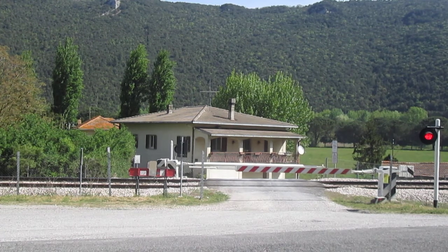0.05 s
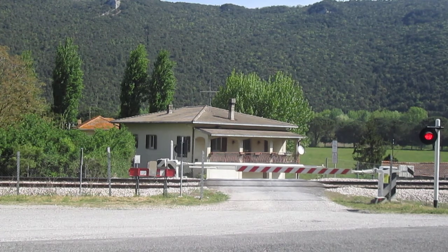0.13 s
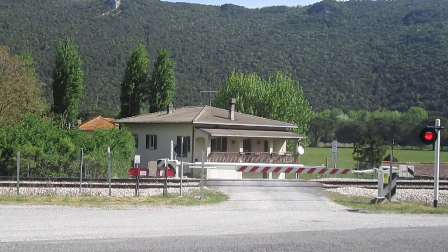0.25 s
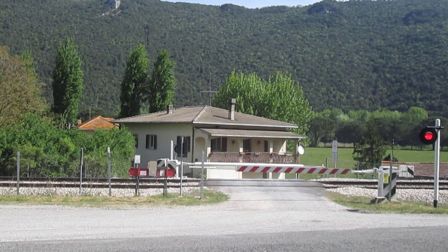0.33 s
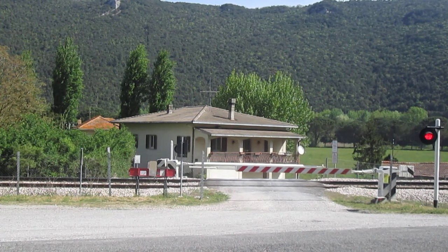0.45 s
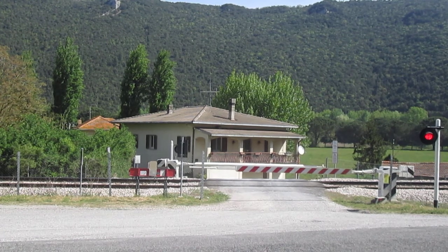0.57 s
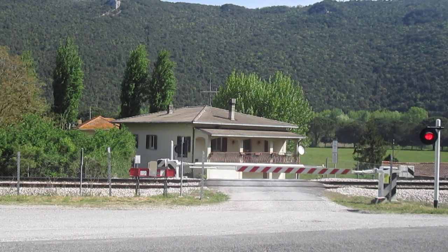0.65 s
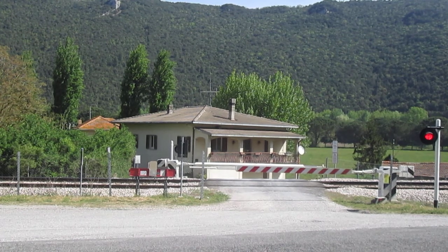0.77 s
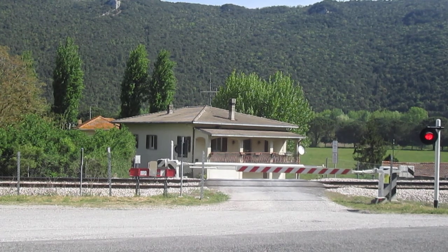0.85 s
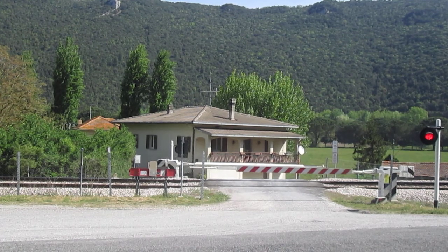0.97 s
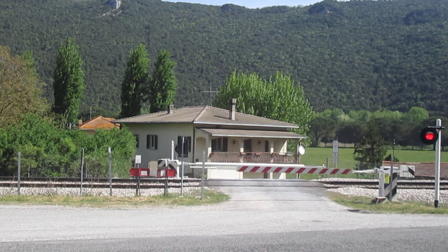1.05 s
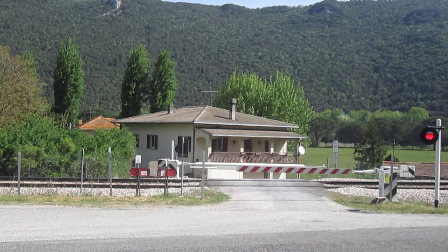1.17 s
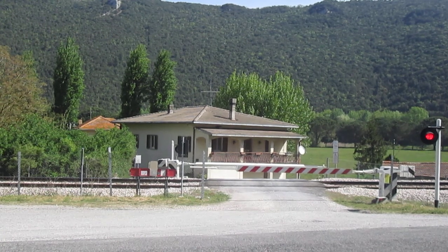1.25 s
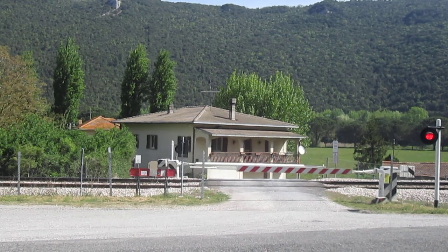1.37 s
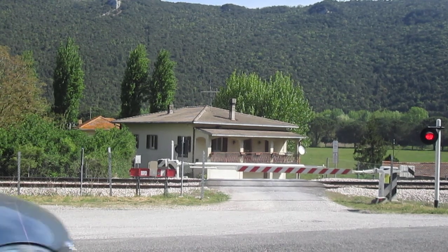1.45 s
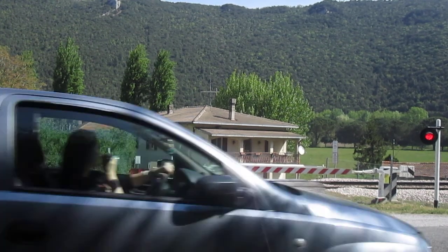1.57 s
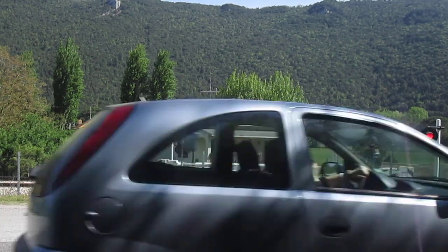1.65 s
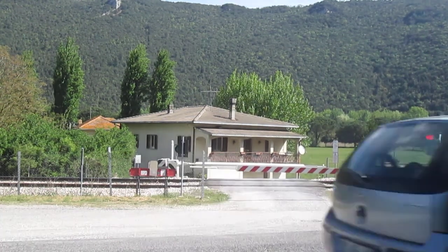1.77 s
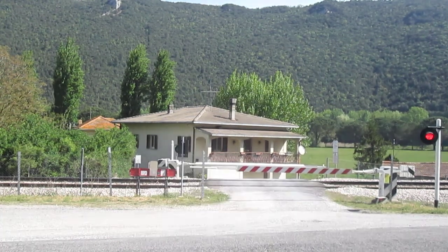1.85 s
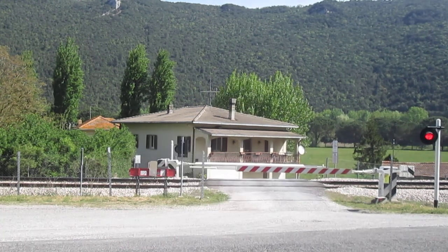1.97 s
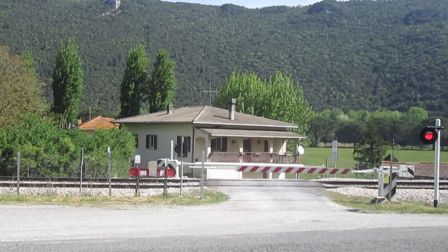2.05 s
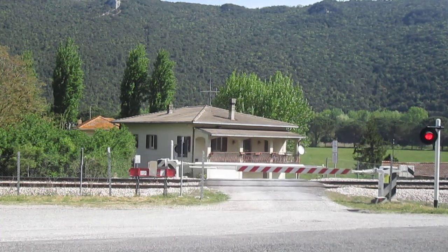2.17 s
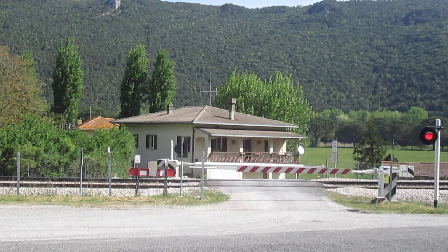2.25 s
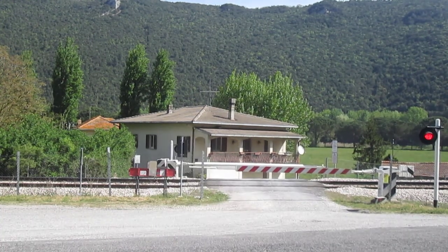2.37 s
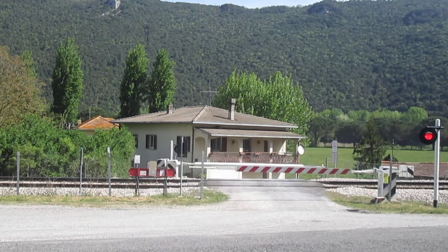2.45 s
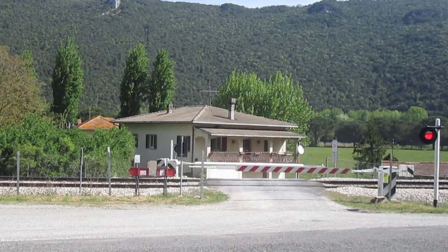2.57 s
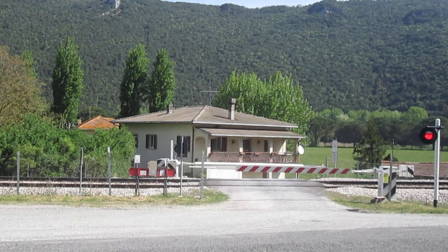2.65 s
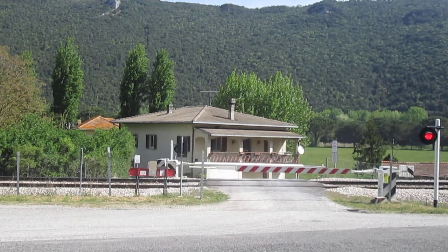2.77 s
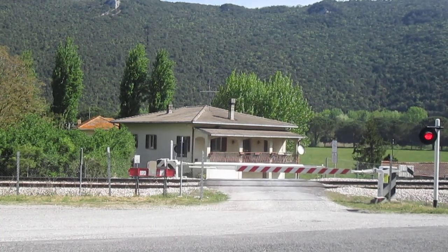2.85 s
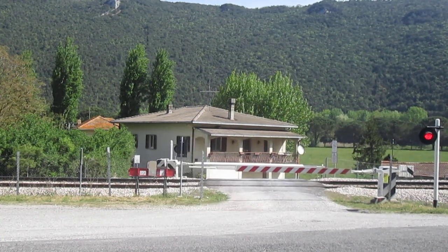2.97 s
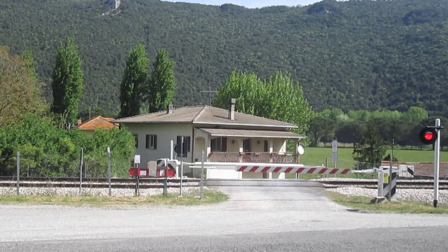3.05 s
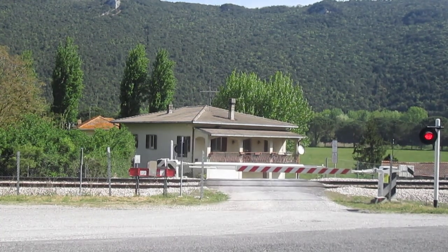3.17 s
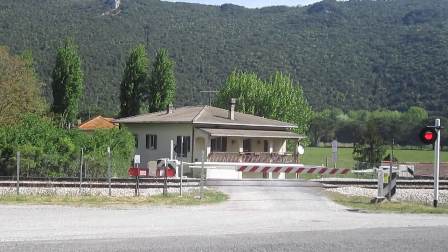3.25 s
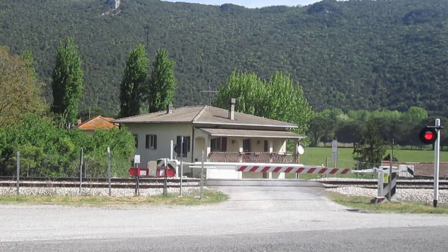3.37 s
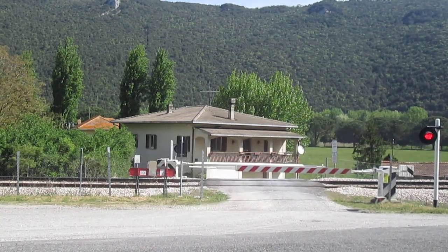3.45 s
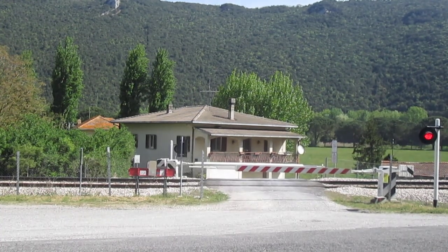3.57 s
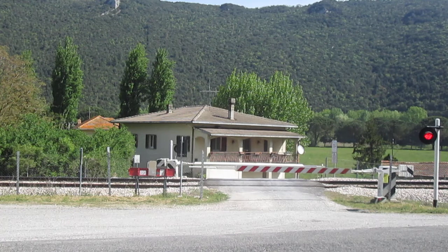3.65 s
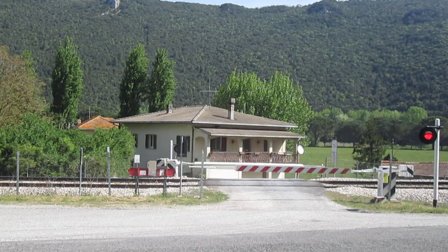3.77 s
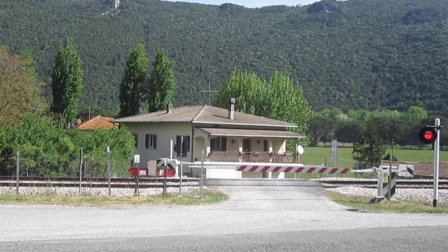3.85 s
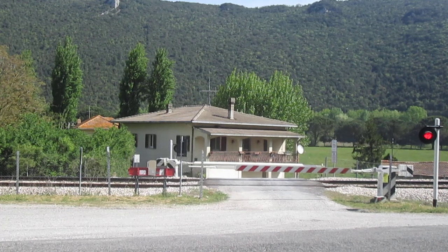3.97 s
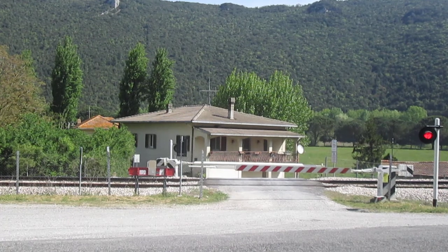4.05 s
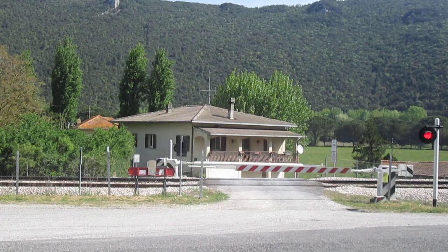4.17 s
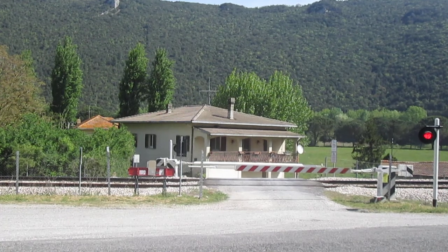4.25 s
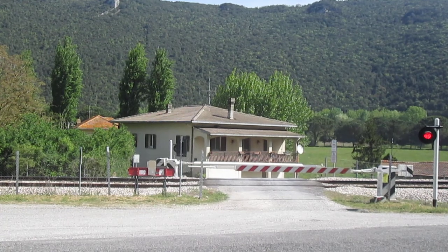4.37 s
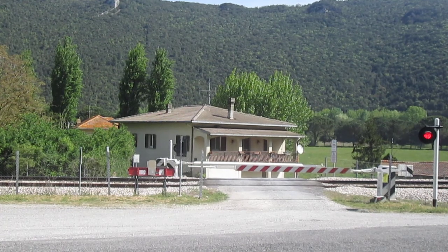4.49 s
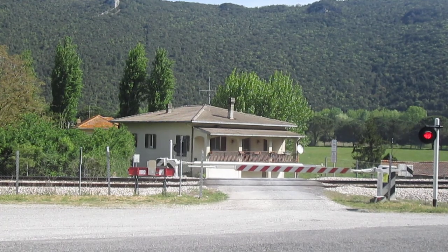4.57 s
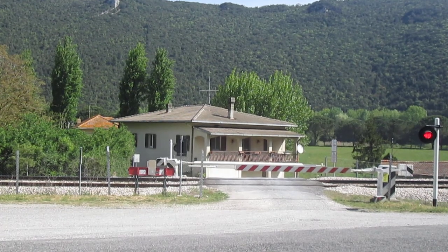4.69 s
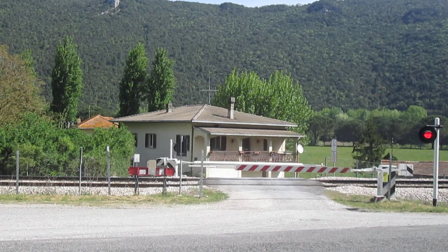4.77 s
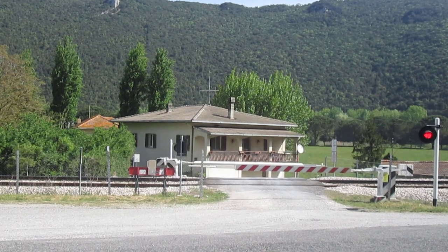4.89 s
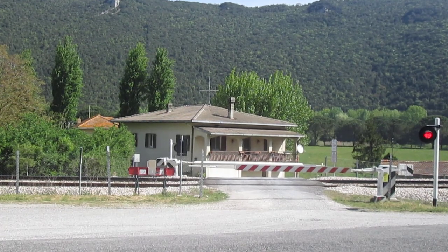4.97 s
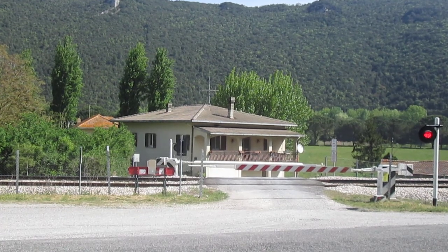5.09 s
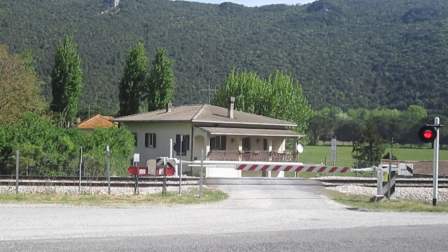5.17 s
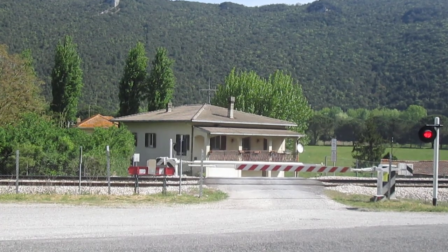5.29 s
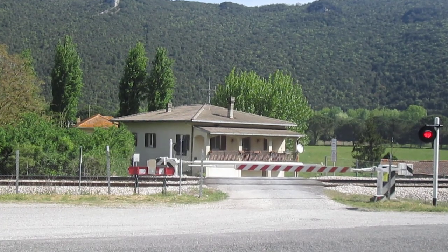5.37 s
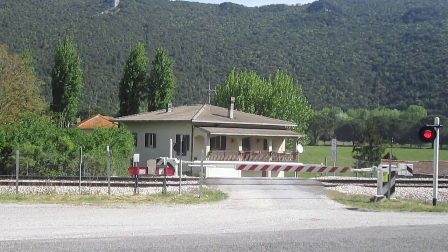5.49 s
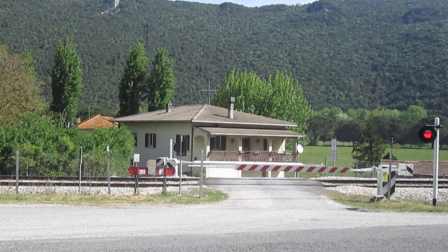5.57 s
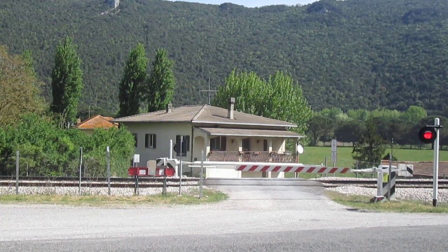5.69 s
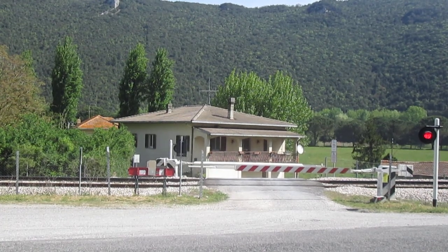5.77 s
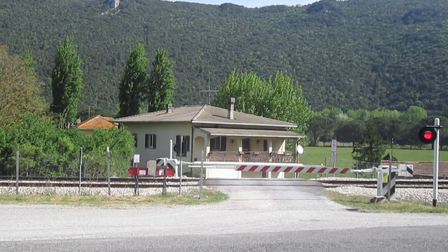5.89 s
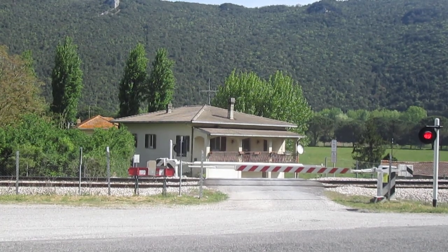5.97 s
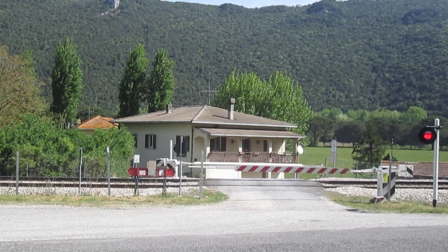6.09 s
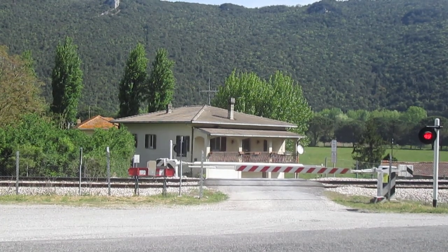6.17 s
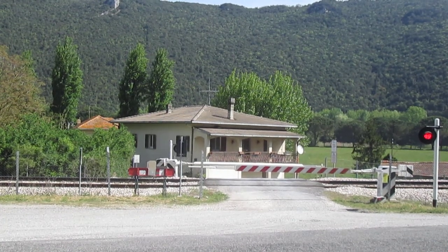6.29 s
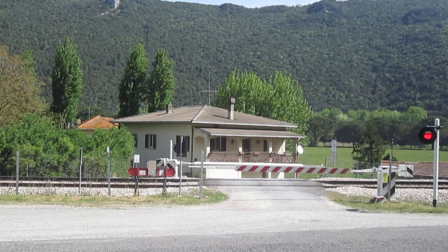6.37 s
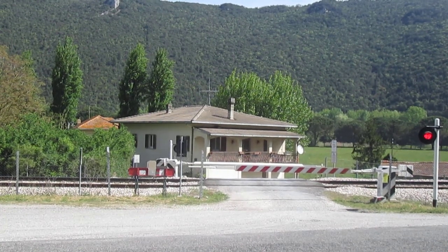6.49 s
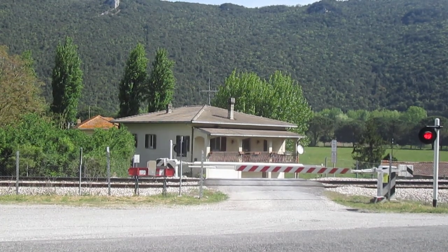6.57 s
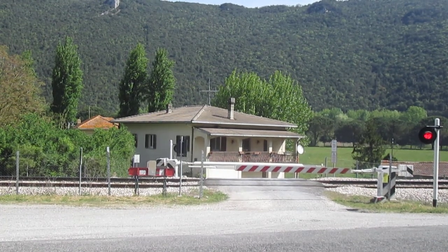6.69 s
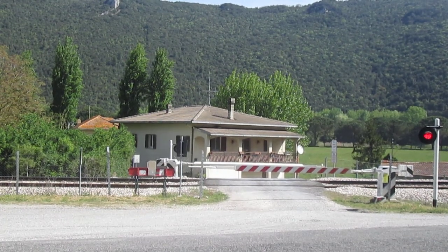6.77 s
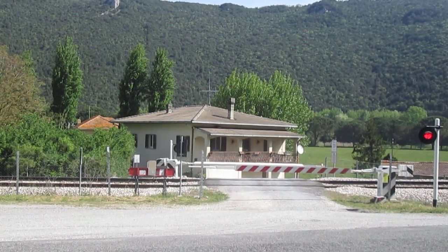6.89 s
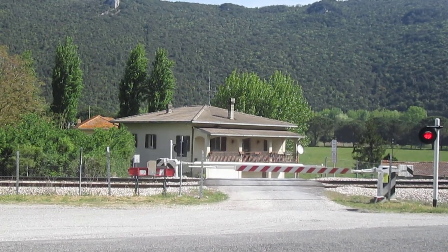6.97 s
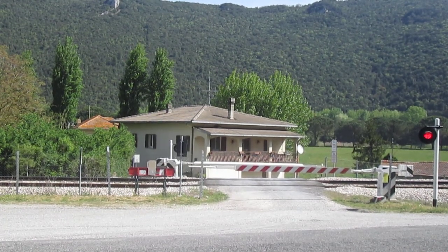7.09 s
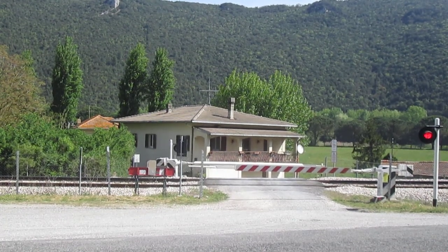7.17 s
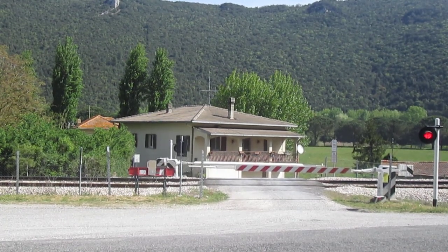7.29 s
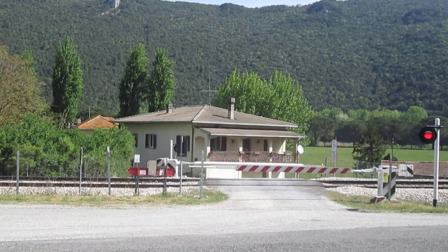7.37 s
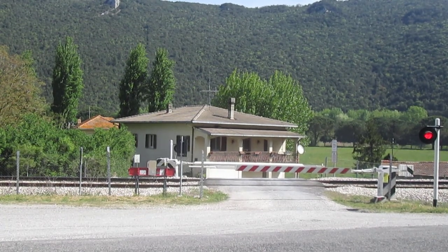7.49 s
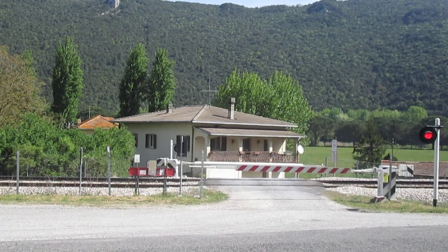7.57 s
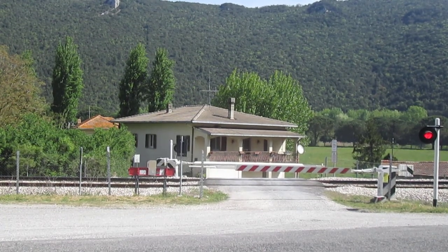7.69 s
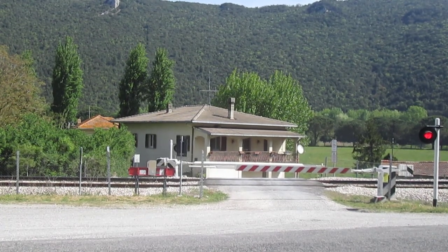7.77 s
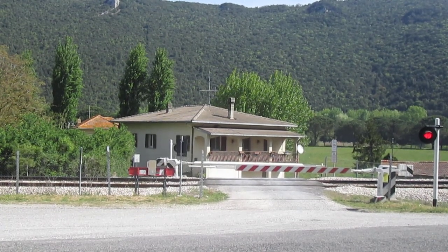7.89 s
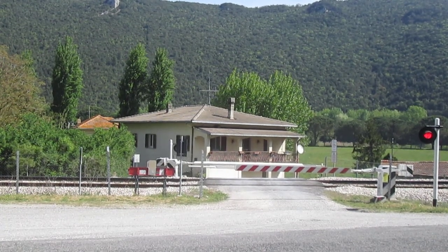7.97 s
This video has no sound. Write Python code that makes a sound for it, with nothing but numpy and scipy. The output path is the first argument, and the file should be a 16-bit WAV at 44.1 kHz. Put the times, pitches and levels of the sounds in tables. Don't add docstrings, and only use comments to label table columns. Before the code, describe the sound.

Tyre roar swells quickly, peaks as a car passes left to right, and recedes, leaving faint idling drone and light, quick birdsong with echoes.

```python
import sys
import numpy as np
from scipy import signal
from scipy.fft import rfft, irfft, next_fast_len
from scipy.io import wavfile
from scipy.ndimage import uniform_filter1d

SR = 44100
rng = np.random.default_rng(int(sys.argv[2]) if len(sys.argv) > 2 else 0)


def undo_db(level):
    steps = np.asarray(level, float) / 20
    return 10 ** steps


def unload_wav(signal):
    wavfile.write(
        sys.argv[1],
        SR,
        np.round(np.clip(np.atleast_2d(signal).T, -1, 1) * 32767).astype(np.int16),
    )


N = 354555
SIZE = next_fast_len(N)
TIME = np.arange(N) / SR
FREQ = np.maximum(np.fft.rfftfreq(SIZE, 1 / SR), 1)
SOUND_M_S = 343

# time in seconds [s], level [dB], brightness [dB].
TYRE_ROAR = [(0, -39.5, 0), (.3, -34, -3.5), (.6, -33.5, 2.5), (1.1, -26, 7), (1.362, -20.5, 3),
             (1.378, -18, 0.5), (1.55, -17.5, -1.5), (1.68, -18, -1.5), (1.9, -24, 3.5), (2.15, -26, 2.5),
             (2.4, -28.5, 1), (2.7, -29, 0), (3.05, -32.5, 2.5), (3.5, -39.5, 4.5), (4.0, -44, -3),
             (4.3, -48.5, -8), (4.7, -56.5, -0.5), (5.3, -66, 2)]
# time [s], side [0 front, 1 side, 2 rear, 3 far].
BEARING = [
    (0, 0),
    (.8, 0.94),
    (1.35, 1.5),
    (1.7, 1.5),
    (2.2, 2),
    (2.9, 2),
    (3.7, 3),
    (8.1, 2.5),
]
# frequency [Hz], spectral level [dB per Hz].
FRONT_COLOUR = [(55, -30), (90, -8), (328, -2), (562, -3.5), (700, -8), (870, -10), (1050, -6),
                (1250, -6.5), (1650, 3), (2100, -5.5), (2900, -20.5), (4400, -26.5), (6300, -35),
                (9500, -46), (15600, -72.5)]
SIDE_COLOUR = [(53, -16), (90, -7), (145, -10), (288, -2), (484, -8.5), (744, -7), (904, -2.5), (1360, -4),
               (2890, -22), (3910, -30.5), (8880, -44), (15600, -62)]
REAR_COLOUR = [(60, -39.5), (100, -12), (250, -5), (313, -5), (400, -16.5), (500, -4), (575, 2), (650, -3),
               (800, -10), (930, -4), (1090, -2), (1270, -5.5), (2100, -15), (2650, -21.5), (3600, -32),
               (8800, -51), (15600, -66)]
FAR_COLOUR = [(60, -36.5), (105, -9), (186, -5.5), (360, -13), (607, 3), (772, -11), (930, -1.5), (1080, 1),
              (1220, -7.5), (1400, -2.5), (2300, -10), (3300, -27), (12000, -58.5), (15600, -70)]
RUMBLE_DB, RUMBLE_FOLLOWS = -0.18, 0.05
HISS_DB, HISS_FOLLOWS, TOP_FOLLOWS = 2.5, 0.84, 0.53
BODY_S, BODY_LENGTH_S, BODY_DB = 1.747, 0.43, 1
# centre time [s], half length [s], centre frequency [Hz], bandwidth [Hz], level [dB].
ROAD_SURGES = [(.57, .06, 9100, 1300, -67), (.586, .002, 9000, 2000, -59), (.606, .003, 7500, 2000, -56),
               (.85, .15, 5370, 1300, -50), (1.3, .12, 2400, 600, -32), (1.4, .1, 12000, 2000, -63),
               (1.5, .08, 395, 80, -24.5), (1.388, .012, 350, 250, -19.5), (1.425, .03, 290, 50, -21),
               (1.41, .03, 980, 60, -20), (1.497, .03, 907, 45, -17), (1.48, .015, 1380, 60, -22),
               (1.55, 0.028, 1200, 50, -22), (1.6, .04, 900, 50, -20.5), (1.65, .05, 1280, 70, -24),
               (1.78, .1, 11500, 1500, -68), (1.85, .05, 2900, 500, -40), (1.88, 0.029, 1160, 80, -27),
               (2.17, .1, 6800, 700, -63), (2.4, .15, 9200, 700, -76), (2.8, .2, 9100, 1000, -73),
               (3.2, .15, 9000, 900, -80), (3.25, .1, 4080, 400, -61), (1.3, .06, 620, 130, -27),
               (2.7, .12, 580, 30, -36), (1.5, .08, 260, 50, -27), (1.73, .06, 210, 40, -27),
               (1.55, .1, 10500, 1800, -62), (2.9, .3, 4000, 500, -61), (1.75, .08, 1450, 200, -28),
               (1.55, .17, 100, 35, -31), (1.35, .08, 70, 12, -33), (.35, .2, 1060, 30, -42),
               (.5, .12, 1740, 60, -38), (2.3, .08, 1080, 40, -33), (1.9, .08, 1700, 120, -34),
               (2.35, .15, 2050, 200, -42), (2.65, .1, 2550, 150, -48), (3.45, .15, 2550, 200, -54),
               (.852, .004, 6000, 2000, -46)]

# multiple of the firing rate [1], level [dB].
EXHAUST_ORDERS = [(1, -0.5), (2, -23), (4, -21), (5, -30)]
# time [s], level [dB].
THIRD_ORDER = [
    (0, -56),
    (1.55, -43),
    (2.6, -54),
    (3.4, -59),
    (4.5, -61),
    (5.6, -63),
    (6.2, -70),
    (8.04, -75),
]
PASSES_S, SPEED_M_S, KERB_M = 1.58, 21.0, 3.4
FIRING_HZ, SAG_HZ_PER_S = 52, .45
EXHAUST_DB, FADE_DB_PER_S = -20.5, 0.27
SPREAD = 0.79
AHEAD_DB = 1
SHADE_S, SHADE_LENGTH_S, SHADE_DB = 1.65, .09, -11
BEND_S, BEND_LENGTH_S, BEND_DB = 4, .2, -4.5

# time [s], peak [dB], frequency [Hz], signed polarity [1].
WAKE_THUMPS = [
    (1.984, -27, 70, -0.87),
    (2.005, -23, 59.9, -0.98),
    (2.234, -22, 80, 0.96),
    (2.982, -30, 64.8, -0.81),
    (3.1687, -17.5, 100.6, 0.53),
    (7.850, -28, 90.05, 0.57),
]
# frequency [Hz], spectral level [dB per Hz].
BUFFET_COLOUR = [(15, -18), (30, -1.5), (45, 0.0), (75, -3), (100, -14.5), (250, -60.5)]
BREEZE_DB, WAKE_S, WAKE_DB, WAKE_RISE_S, WAKE_FALL_S = -64, 1.5, -47, 0.5, 0.6

# time [s], level [dB].
WAITING_ENGINE = [
    (0, -54),
    (2.4, -48),
    (4.8, -52),
    (6, -48.5),
    (7, -48),
    (8.04, -44),
]
IDLE_HZ = 82.84

# start [s], length [s], first pitch [Hz], last pitch [Hz], peak [dB].
ARCHES = [
    (7.165, 0.068, 1960, 1934, -59.5),
]
# start [s], length [s], first pitch [Hz], last pitch [Hz], peak [dB].
DIPS = [
    (7.012, 0.049, 2350, 2050, -62),
    (6.78, 0.056, 3120, 3000, -60.5),
    (7.272, 0.06, 2950, 2800, -63),
]
# start [s], length [s], first pitch [Hz], last pitch [Hz], peak [dB].
SWOOPS = [
    (5.53, .052, 4300, 3300, -55),
    (5.628, .02, 3450, 2800, -57),
    (5.898, .036, 3300, 2300, -55),
    (6.168, .04, 2800, 2420, -57),
    (6.4, .075, 3050, 2650, -66),
]
# start [s], length [s], first pitch [Hz], last pitch [Hz], peak [dB].
FALLS = [(3.612, .02, 3450, 3200, -59), (4.352, 0.0199, 3494, 2750, -57), (4.893, 0.018, 3270, 3150, -57),
         (5.16, 0.02, 3490, 3125, -52), (5.462, 0.022, 3480, 3050, -61), (5.482, .025, 3150, 3050, -63),
         (5.572, .038, 3330, 3180, -51), (5.612, .014, 3400, 2850, -57), (5.65, .02, 2850, 2600, -54),
         (5.672, .014, 3750, 2700, -62), (4.803, .028, 3250, 2700, -61), (4.908, .024, 3150, 2350, -59),
         (5.6, .03, 4300, 3500, -66), (5.7, .02, 3300, 2800, -65), (3.882, .016, 3550, 3050, -61),
         (5.955, 0.04, 2900, 2770, -52), (5.93, .025, 3200, 2850, -62), (6.068, 0.068, 3130, 2830, -52),
         (6.14, 0.0246, 3027, 2458, -53.5), (6.552, 0.065, 2830, 2480, -53), (7.735, .03, 3150, 2950, -67),
         (6.918, 0.029, 3300, 2644, -58), (6.984, 0.039, 3280, 2045, -54.5), (7.25, 0.023, 3480, 3000, -66),
         (7.352, 0.036, 3020, 2930, -58), (7.4, .018, 3200, 2950, -65), (7.485, 0.018, 2600, 2430, -64)]
# start [s], length [s], first pitch [Hz], last pitch [Hz], peak [dB].
RISES = [(4.298, 0.016, 3950, 4600, -61), (4.336, .018, 3050, 3622, -59), (4.737, 0.027, 3373, 3500, -66.5),
         (5.385, 0.0714, 2110, 2508, -56.5), (5.428, 0.0216, 2970, 3510, -54),
         (6.048, 0.022, 2972, 3500, -61), (6.528, 0.031, 2450, 2810, -56), (6.587, .013, 3000, 3600, -59),
         (6.852, .068, 2180, 2550, -55.5), (6.892, 0.0283, 2820, 3334, -56.5),
         (7.045, .085, 1885, 2400, -60.5), (7.83, 0.06, 2978, 3170, -66), (4.785, .02, 3000, 3250, -59),
         (5.643, .01, 2700, 2850, -55), (5.855, .014, 2800, 3300, -62), (5.93, .02, 2200, 2400, -61),
         (6.96, .06, 4100, 4200, -70), (7.5, .025, 2430, 2520, -61), (3.868, .014, 3200, 3550, -63),
         (2.852, .014, 4050, 4350, -59), (6.24, .07, 2850, 3000, -69), (7.42, .09, 2950, 3100, -70)]
# start [s], length [s], pitch [Hz], peak [dB].
PIPS = [(4.001, 0.024, 4017, -60.5), (4.015, 0.0317, 3260, -58), (4.329, 0.041, 4330, -70.5),
        (4.388, 0.025, 3250, -66), (4.412, .012, 2950, -64), (5.675, 0.038, 3240, -67.5),
        (5.864, 0.0373, 3320, -53.5), (5.913, 0.023, 3350, -58), (6.258, 0.059, 2980, -65),
        (6.27, 0.04, 4080, -61), (6.478, 0.014, 4250, -63), (6.495, .016, 4170, -61),
        (6.603, .016, 3400, -55), (6.86, 0.0273, 3376, -61.5), (6.95, .035, 2500, -67),
        (5.31, .055, 2330, -70), (5.005, .03, 2370, -64), (4.62, .06, 7200, -77), (5.15, .05, 6300, -75),
        (5.44, .02, 2460, -58), (6.968, .02, 3150, -54), (6.72, 0.017, 4100, -61), (6.78, 0.135, 4110, -71),
        (6.695, .018, 4100, -60), (7.418, .02, 2950, -60), (5.662, .012, 3700, -62), (6.6, .11, 2600, -70),
        (6.785, .07, 3300, -67), (5.33, .06, 4100, -68), (7.155, 0.016, 4265, -57),
        (7.233, .014, 3590, -62.5), (7.292, .02, 4210, -69.5), (7.524, 0.028, 3320, -66),
        (7.57, .022, 3250, -56), (7.612, 0.014, 3150, -61), (7.7, 0.03, 3420, -70)]
ARCH_BOW, DIP_BOW, SWOOP_BOW = 0.093, -0.12, -.05
START_DB, END_DB, PEAK_SHARE, HOLD_SHARE = -5.5, -7.5, 0.31, .4
# time of the drop [s], drop length [s], top pitch [Hz], bottom pitch [Hz], peak [dB].
HOOKS = [
    (5.25, 0.04, 4602, 4020, -56.5),
    (6.292, .026, 4065, 3198, -53),
    (6.716, 0.026, 4063, 3260, -51.5),
]
HOOK_SAG = .25
LEAD_S, LEAD_DB, TOP_DB = 0.02, -16, -6.5
SHELF_S, SHELF_LIFT, SHELF_DB = 0.03, 0.04, -1
TAIL_S, TAIL_DB = .012, -12.5
# start [s], first pitch [Hz], last pitch [Hz], level [dB].
CHIRPS = [(3.526, 4110, 4810, -59.5), (3.598, 2970, 3600, -57), (3.986, 4500, 3860, -65),
          (4.034, 3900, 2900, -60), (4.306, 4000, 3100, -71), (5.068, 3300, 3750, -62),
          (5.088, 3300, 2800, -64), (4.775, 3300, 2800, -64), (7.222, 3300, 3800, -60),
          (7.252, 2900, 3400, -62), (4.765, 3494, 3250, -65), (4.972, 3800, 2910, -55.5),
          (5.002, 2353, 2910, -58), (5.016, 2874, 3400, -61.5), (5.019, 2998, 2303, -57),
          (5.056, 3314, 3820, -60.5), (5.073, 3396, 4690, -59.5), (5.092, 4600, 4700, -66.5),
          (5.147, 3126, 3710, -58), (5.372, 2370, 2116, -58), (5.188, 2810, 2400, -63),
          (5.618, 4390, 5250, -68.5), (5.877, 3950, 4600, -62), (6.01, 4000, 4400, -67),
          (5.852, 2600, 3200, -65), (6.878, 3400, 2800, -63), (6.488, 4170, 2990, -65),
          (6.512, 4180, 4700, -65), (6.519, 3900, 2750, -53), (6.535, 3770, 2830, -58),
          (6.49, 3900, 2700, -63), (6.524, 4200, 3900, -61), (6.553, 3485, 3690, -61),
          (7.186, 3920, 5400, -67), (7.217, 2900, 3900, -60.5), (7.19, 3150, 3550, -58),
          (7.204, 3400, 2900, -58), (7.198, 3900, 3400, -64), (7.245, 3100, 2700, -62),
          (7.162, 3900, 3000, -66), (7.545, 3700, 3900, -66), (5.922, 2400, 2150, -62),
          (5.92, 3250, 3550, -62), (6.066, 3790, 3300, -61), (7.243, 2797, 3390, -60),
          (7.331, 3620, 3215, -64), (7.994, 3483, 4970, -64.5), (8.018, 4380, 5000, -70.5)]
CHIRP_S = 0.01414
# start [s], length [s], lowest [Hz], highest [Hz], level [dB].
FLURRIES = [
    (3.58, 0.051, 3010, 4200, -69),
    (3.99, .06, 3000, 4530, -64),
    (4.299, 0.072, 2890, 4710, -69),
    (5.04, .08, 2990, 4610, -60),
    (5.115, .38, 3997, 5386, -66),
    (5.6, 0.085, 2780, 4830, -62),
    (5.879, 0.059, 2384, 3590, -61),
    (6.49, 0.069, 2824, 4825, -66),
    (6.87, .06, 2696, 3490, -62),
    (7.168, 0.1, 2523, 4370, -65),
]
STROKE_DB, STROKE_S = -2.5, 0.00734
# time [s], level [dB].
FAR_FLOCK = [
    (3.4, -82),
    (4.9, -66.5),
    (6.9, -68),
    (7.5, -69),
    (8.04, -89),
]
# centre time [s], half length [s], centre frequency [Hz], bandwidth [Hz], level [dB].
TWITTER_HAZE = [(4.63, .06, 7200, 350, -78), (4.65, .1, 5100, 400, -74), (5.17, .06, 6300, 250, -76),
                (5.15, .08, 5200, 500, -72), (5.38, .14, 4500, 400, -67), (5.63, .06, 4300, 600, -68),
                (5.78, .04, 4150, 150, -69), (6.54, .03, 4500, 700, -66), (6.85, .1, 3300, 200, -64),
                (7.1, .05, 3100, 200, -65), (5.96, .04, 3250, 200, -64), (6.02, .03, 2800, 150, -64),
                (6.17, .04, 2950, 300, -63), (5.1, .1, 3200, 500, -67), (5.65, .04, 3500, 500, -64),
                (7.55, .06, 3000, 200, -68), (7.9, .03, 3350, 150, -69)]

# frequency [Hz], spectral level [dB per Hz].
HUSH_COLOUR = [(56, -24.5), (95, -7.5), (137, -12), (288, -9), (558, -18), (802, -19.5), (2480, -30.5),
               (3210, -30), (3970, -33), (6350, -39), (12000, -47.5), (15600, -55)]
HUSH_DB = -53
# frequency [Hz], width [Hz].
NOTCHES = [
    (3940, 200),
    (7850, 200),
]


def along(table):
    s, *columns = np.transpose(table)
    return [np.interp(TIME, s, c) for c in columns]


def colour(points, lo_hz, hi_hz):
    hz, db = np.transpose(points)
    gain = undo_db(np.interp(np.log(FREQ), np.log(hz), db, left=-120, right=-120))
    return gain / np.sqrt(np.mean(gain ** 2 * (FREQ > lo_hz) * (FREQ < hi_hz)))


def bands(centres_hz):
    place = np.interp(np.log(FREQ), np.log(centres_hz), np.arange(len(centres_hz)))
    return [np.cos(np.pi / 2 * np.clip(place - k, -1, 1)) ** 2 for k in range(len(centres_hz))]


def walk(rate):
    hold = int(SR / rate)
    steps = np.repeat(rng.standard_normal(N // hold + 1), hold)
    return 1.5 * uniform_filter1d(uniform_filter1d(steps, hold), hold)[:N]


def puffs(rows):
    out = np.zeros(N)
    noises = rng.standard_normal((len(rows), SR // 2))
    noise_hz = np.fft.rfftfreq(SR // 2, 1 / SR)
    for (s, half_s, hz, width_hz, db), noise in zip(rows, noises):
        reach = min(int(2 * half_s * SR) + SR // 100, SR // 4)
        window = np.exp(-((noise_hz - hz) / width_hz) ** 2)
        band = irfft(rfft(noise) * window)[:2 * reach]
        swell = np.exp(-(np.arange(-reach, reach) / (half_s * SR)) ** 2)
        puff = swell * band
        rms = np.sqrt(np.sum(puff ** 2) / np.sum(swell ** 2))
        centre = int(s * SR)
        out[centre - reach:centre + reach] += undo_db(db) * puff / rms
    return out


def tyres(flicker_db=0.26, patch_db=.5, air=0.101):
    level_db, bright_db = along(TYRE_ROAR)
    rumble_db = RUMBLE_DB + RUMBLE_FOLLOWS * bright_db
    rumble_db = rumble_db + BODY_DB * np.exp(-((TIME - BODY_S) / BODY_LENGTH_S) ** 2)
    hiss_db = HISS_DB + HISS_FOLLOWS * bright_db
    level_db = level_db - 30 * np.clip(TIME - TYRE_ROAR[-1][0], 0, None)
    top_db = TOP_FOLLOWS * bright_db + air * (level_db + 24.5)
    trims_db = rumble_db, patch_db * walk(24.67), bright_db, hiss_db, top_db

    bearing, = along(BEARING)
    noise = rfft(rng.standard_normal(SIZE))
    colours = FRONT_COLOUR, SIDE_COLOUR, REAR_COLOUR, FAR_COLOUR
    sides = [noise * colour(c, 450, 1400) for c in colours]
    shares = [np.clip(1 - abs(bearing - k), 0, 1) for k in range(len(sides))]
    out = 0
    for window, trim_db in zip(bands([250, 800, 2200, 5500, 12000]), trims_db):
        band = sum(share * irfft(side * window, SIZE)[:N] for share, side in zip(shares, sides))
        out = out + band * undo_db(trim_db + flicker_db * walk(9.29))
    return out * undo_db(level_db)


def road_patches():
    return puffs(ROAD_SURGES)


def engine(hz, db, orders, jitter, wobble_db):
    phase = 2 * np.pi * np.cumsum(hz * (1 + jitter * walk(12.))) / SR
    tone = sum(undo_db(o_db + wobble_db * walk(10)) * np.sin(k * phase) for k, o_db in orders)
    return np.sqrt(2) * tone * undo_db(db)


def passing_pipe():
    since = TIME - PASSES_S
    far_m = np.hypot(SPEED_M_S * since, KERB_M)
    leaving_m_s = SPEED_M_S ** 2 * since / far_m
    hz = (FIRING_HZ - SAG_HZ_PER_S * since) / (1 + leaving_m_s / SOUND_M_S)
    spread_db = -SPREAD * 20 * np.log10(far_m / KERB_M)
    fade_db = -FADE_DB_PER_S * np.abs(since)
    shade_db = SHADE_DB * np.exp(-((TIME - SHADE_S) / SHADE_LENGTH_S) ** 2)
    screen_db = BEND_DB / (1 + np.exp((BEND_S - TIME) / BEND_LENGTH_S))
    ahead_db = -AHEAD_DB * leaving_m_s / SPEED_M_S
    return hz, EXHAUST_DB + spread_db + fade_db + shade_db + screen_db + ahead_db


def exhaust():
    hz, db = passing_pipe()
    hum = engine(hz, db, EXHAUST_ORDERS, jitter=0.005, wobble_db=0.9)
    drone = engine(hz, *along(THIRD_ORDER), [(3, 0)], jitter=.004, wobble_db=1.5)
    return hum + drone


def wake():
    since = TIME - WAKE_S
    swell = np.exp(np.minimum(since / WAKE_RISE_S, -since / WAKE_FALL_S))
    gust = undo_db(BREEZE_DB) + undo_db(WAKE_DB) * swell
    noise = rfft(rng.standard_normal(SIZE))
    sway = irfft(noise * colour(BUFFET_COLOUR, 20, 32.8), SIZE)[:N]
    out = sway * gust * undo_db(2.0 * walk(5.6))
    for s, peak_db, hz, sign in WAKE_THUMPS:
        span = slice(int(s * SR) - SR // 20, int(s * SR) + SR // 20)
        cycles = (TIME[span] - s) * hz
        bump = np.exp(-(cycles / .45) ** 2) * np.cos(2 * np.pi * cycles + 1.1)
        out[span] += sign * undo_db(peak_db) * bump
    return out


def waiting_engine():
    orders = [(1, -1.0), (2, -35.5)]  # (multiple, dB)
    return engine(IDLE_HZ, *along(WAITING_ENGINE), orders, jitter=0.00273, wobble_db=0.5)


def add_whistle(out, note, tremble):
    s, hz, db = np.transpose(note)
    span = slice(int((s[0] - .003) * SR), min(int((s[-1] + 0.0028) * SR), N))
    t = TIME[span]
    edge = np.clip(np.minimum(t - t[0], t[-1] - t) / 0.00158, 0, 1)
    pitch = uniform_filter1d(np.interp(t, s, hz), size=200, mode="nearest")
    pitch = pitch * (1 + 0.006 * tremble[0, span])
    level = undo_db(np.interp(t, s, db) + 1.3 * tremble[1, span])
    out[span] += level * edge * np.sin(2 * np.pi * np.cumsum(pitch) / SR)


def song():
    level = [(s, length, hz, hz, db) for s, length, hz, db in PIPS]
    part = np.linspace(0, 1, num=9)
    swell_db = np.interp(part, [0, PEAK_SHARE, PEAK_SHARE + HOLD_SHARE, 1], [START_DB, 0, 0, END_DB])
    shapes = (ARCHES, ARCH_BOW), (DIPS, DIP_BOW), (SWOOPS, SWOOP_BOW), (FALLS + RISES + level, 0)
    for rows, bow in shapes:
        for s, length, first_hz, last_hz, db in rows:
            line_hz = first_hz + part * (last_hz - first_hz)
            hz = line_hz * (1 + bow * np.sin(np.pi * part))
            yield np.transpose([s + part * length, hz, db + swell_db])
    for s, drop, top_hz, low_hz, db in HOOKS:
        end = s + drop + SHELF_S
        half_hz = low_hz + HOOK_SAG * (top_hz - low_hz)
        yield [(s - LEAD_S, top_hz, db + LEAD_DB),
               (s, top_hz, db + TOP_DB),
               (s + drop / 2, half_hz, db + TOP_DB / 2),
               (s + drop, low_hz, db),
               (end, low_hz * (1 + SHELF_LIFT), db + SHELF_DB),
               (end + TAIL_S, low_hz, db + TAIL_DB)]


def near_birds(tremble, near_db=3.5, chirp_db=1.5, strokes_each=28):
    near = np.zeros(N)
    for note in song():
        add_whistle(near, note, tremble)
    near *= undo_db(near_db)
    for s, first_hz, last_hz, db in CHIRPS:
        chirp = [(s, first_hz, db + chirp_db), (s + CHIRP_S, last_hz, db + chirp_db)]
        add_whistle(near, chirp, tremble)
    draws = rng.random((len(FLURRIES), strokes_each, 4))
    for (start, length, lo_hz, hi_hz, db), strokes in zip(FLURRIES, draws):
        for when, first, last, weak in strokes:
            s = start + length * when
            hz = lo_hz + (hi_hz - lo_hz) * first
            end_hz = lo_hz + (hi_hz - lo_hz) * .5 * (first + last)
            stroke_db = db + STROKE_DB - 6 * weak
            add_whistle(near, [(s, hz, stroke_db), (s + STROKE_S, end_hz, stroke_db)], tremble)
    return near


def far_flock(tremble, count=420):
    far = np.zeros(N)
    for when, length, pitch, glide, weak in rng.random((count, 5)):
        s, hz = 3.4 + 4.55 * when, 2600 + 1700 * pitch ** 1.4
        end_s, end_hz = s + 0.00488 + 0.01615 * length, hz + 1000 * (glide - .55)
        add_whistle(far, [(s, hz, -10 * weak), (end_s, end_hz, -10 * weak)], tremble)
    return far * undo_db(along(FAR_FLOCK)[0])


def birds(leaves_db=-9, walls_db=-7, far_echo_db=1.5, echo_t60=0.91):
    tremble = np.array([walk(150), walk(120)])
    near, far = near_birds(tremble), far_flock(tremble)
    t = TIME[:SR]
    leaves = rng.standard_normal(SR) * np.exp(-t / .012)
    onset = np.clip(t / 0.043, 0, 1) ** 2
    walls = rng.standard_normal(SR) * np.exp(-np.log(1000) * t / echo_t60) * onset
    leaves, walls = (echo / np.sqrt(np.sum(echo ** 2)) for echo in (leaves, walls))
    near_echo = signal.fftconvolve(near, undo_db(leaves_db) * leaves + undo_db(walls_db) * walls)[:N]
    far_echo = undo_db(far_echo_db) * signal.fftconvolve(far, walls)[:N]
    return near + near_echo + far + far_echo


def twitter_haze():
    return puffs(TWITTER_HAZE)


def hush():
    noise = rfft(rng.standard_normal(SIZE)) * colour(HUSH_COLOUR, 100, 1800)
    low, middle, hiss = (irfft(noise * w, SIZE)[:N] for w in bands([250, 900, 3000]))
    return undo_db(HUSH_DB) * (low * undo_db(0.72 * walk(1.59)) + middle * undo_db(0.7 * walk(1.74)) + hiss)


def scene():
    car = tyres() + road_patches() + exhaust() + wake()
    background = waiting_engine() + birds() + twitter_haze() + hush()
    return (car + background)[None]


def roll_off(x):
    return signal.sosfilt(signal.butter(12, 15700, fs=SR, output="sos"), x)


def record(dry):
    for hz, width_hz in NOTCHES:
        dry = signal.lfilter(*signal.iirnotch(hz, hz / width_hz, fs=SR), dry)
    return roll_off(dry)


dry = scene()
out = record(dry)
unload_wav(out)
```